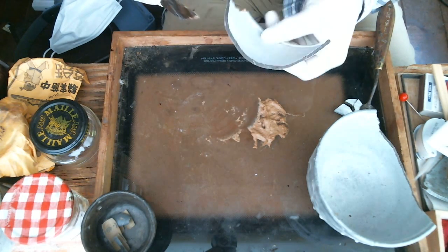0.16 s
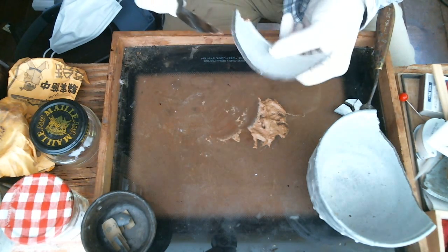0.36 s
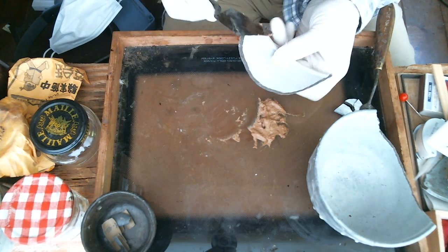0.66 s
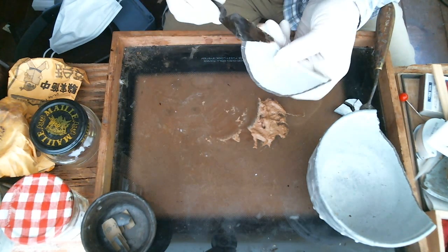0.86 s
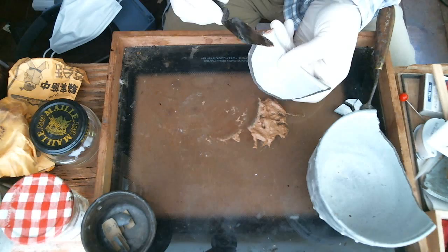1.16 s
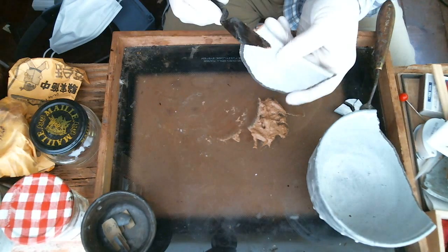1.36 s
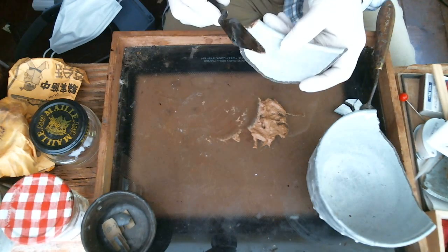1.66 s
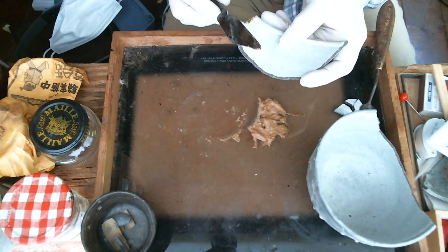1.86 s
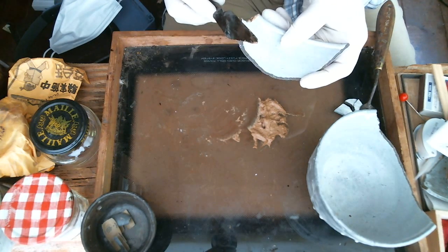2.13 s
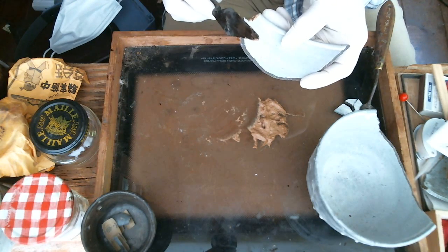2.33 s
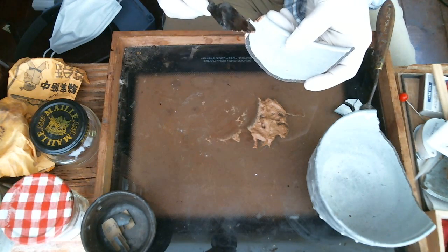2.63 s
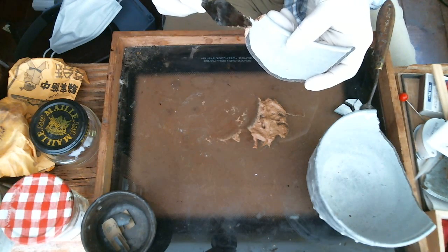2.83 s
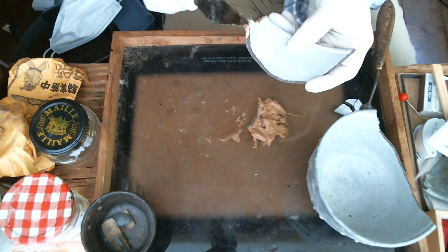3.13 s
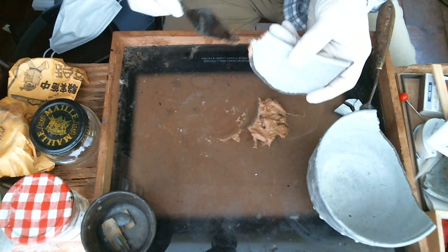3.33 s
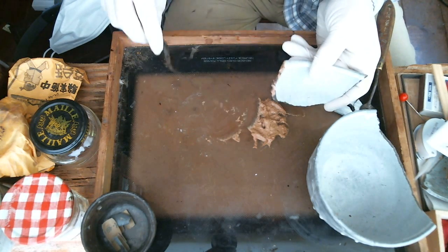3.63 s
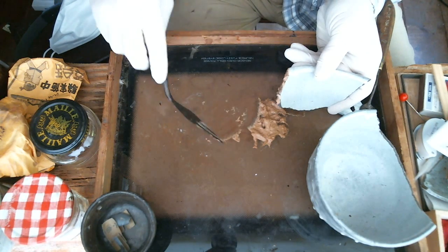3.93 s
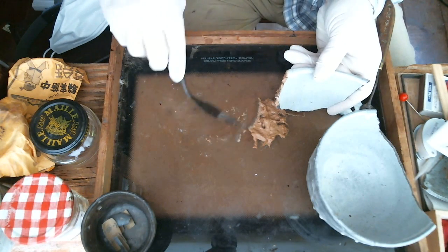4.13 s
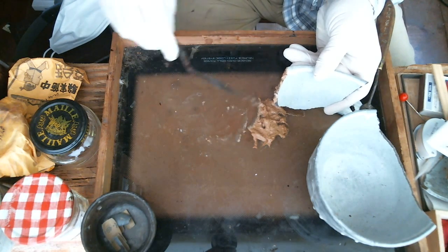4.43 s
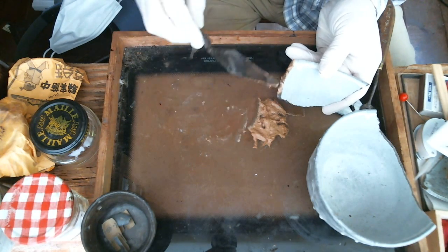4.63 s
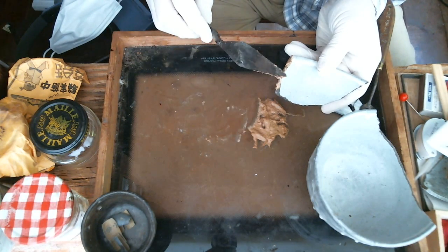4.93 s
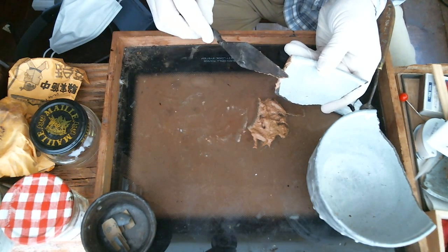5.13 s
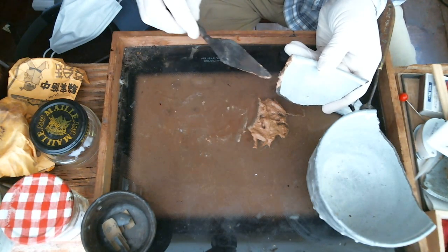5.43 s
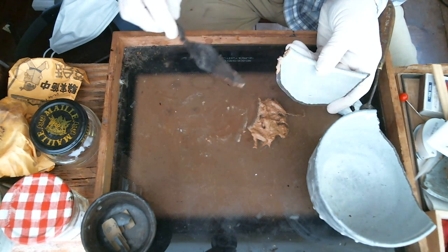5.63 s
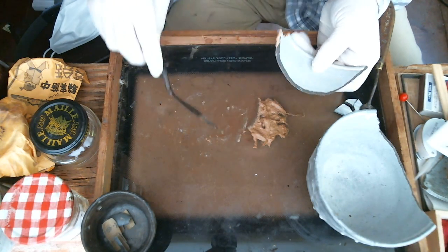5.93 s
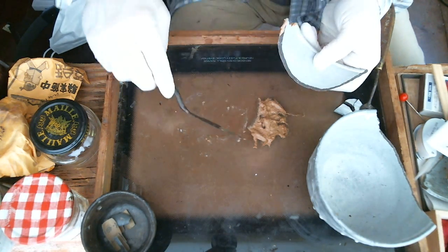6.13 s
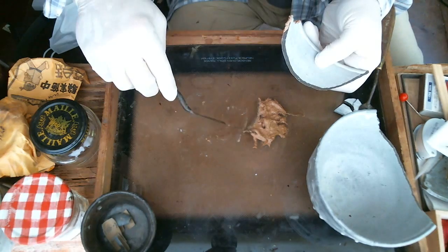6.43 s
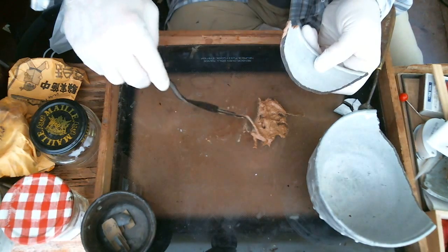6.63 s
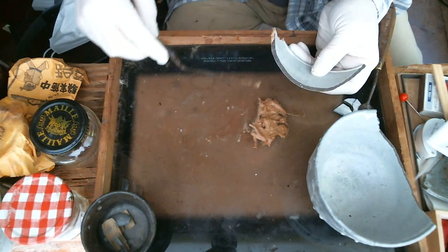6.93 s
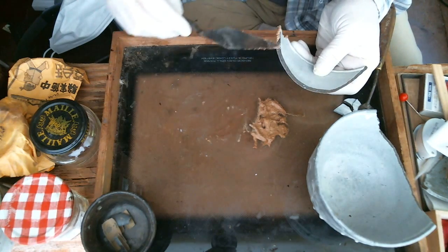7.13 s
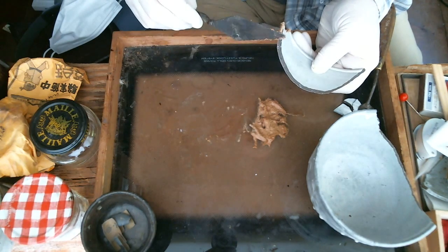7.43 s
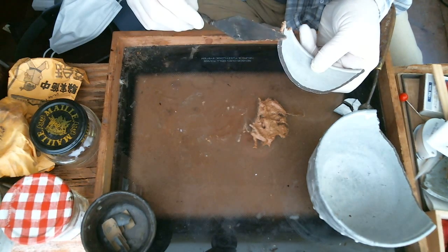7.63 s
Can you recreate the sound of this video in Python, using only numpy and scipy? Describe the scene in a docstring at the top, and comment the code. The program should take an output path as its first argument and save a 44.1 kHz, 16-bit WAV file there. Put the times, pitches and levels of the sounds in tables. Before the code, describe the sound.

Close up indoors, a metal blade ticks and scratches against broken pottery, with a faint brush of gloves. It moves to a glass slab for a rough, catching scrape, returns to the pottery with a burst of crisp clicks, then scrapes the glass again among soft tray knocks. A quiet electronic hiss with soft, rapid low pulsing runs underneath.

```python
"""A steel palette knife works paste on a ceramic shard and scrapes a glass slab, close to a camera.
From the start, the camera's electronics add hiss, faint whines and a soft thump per frame.
To 3.7 s the knife spreads and taps on the broken edge: grit hisses, blade and shard ring, gloves brush.
Near 4 s the blade scrapes and bites the slab; glass rings, the tray under it rumbles. Shard work resumes,
loudest near 5.3 s. Soft tray knocks, sparse before, cluster after 6 s around a second scrape at 6.5 s."""
import sys
import numpy as np
from scipy import signal
from scipy.fft import rfft, irfft, next_fast_len
from scipy.io import wavfile
from scipy.ndimage import map_coordinates

SR = 44100
rng = np.random.default_rng(int(sys.argv[2]) if len(sys.argv) > 2 else 0)


def master(y):
    """Save y as 16-bit WAV."""
    cut = np.clip(np.atleast_2d(y).T, -1, 1)
    pcm = np.round(cut * 32767)  # scale
    wavfile.write(sys.argv[1], SR, pcm.astype(np.int16))


N = 343539

# Shard strokes and glove rubs: (start [s], press [s], hold [s], lift [s], force [dB], centre [Hz],
# half-width [oct], blade drive [dB], shard drive [dB])
SHARD_STROKES = [ (0, 0.021, 0.018, 0.04, -57, 5300, 0.3, -3, 5),
                 (.035, 0.016, 0.07, 0.096, -53, 5960, 0.38, 2, -8),
                 (0.198, .06, 0.076, .06, -81, 6700, 0.45, -8, -19),
                 (0.418, 0.045, .002, 0.044, -48.5, 6640, 0.27, -15, -5),
                 (0.454, 0.024, 0.036, 0.053, -60.5, 980, 0.24, -8, -4.5),
                 (0.5, 0.031, .03, 0.058, -63.5, 7200, 0.28, 11.5, -17),
                 (0.577, .01, 0.035, 0.067, -70, 4760, 0.041, 13, -18),
                 (0.87, 0.023, 0.037, 0.033, -57, 7300, 0.33, 6, -9),
                 (1.252, 0.03, 0.029, .01, -55, 7900, 0.54, 8.5, -10),
                 (1.314, 0.018, 0.021, 0.049, -54, 3500, 0.87, 6, 6),
                 (1.459, 0.028, .002, 0.019, -51, 6250, 0.77, -5, 15),
                 (1.514, 0.0093, 0.11, 0.074, -86, 4900, .99, -5, 12),
                 (1.736, 0.012, .005, 0.11, -53, 3100, 1, 7, 9.5),
                 (1.8, 0.013, .01, .02, -80, 2600, 0.33, -8, -4),
                 (1.915, 0.018, 0.0022, 0.028, -47, 5170, .9, 13, 14.5),
                 (1.952, 0.014, .002, 0.047, -44.5, 5330, .9, 8.5, 8.5),
                 (2, 0.022, .002, 0.029, -50, 5430, 1, 8, 9.5),
                 (2.027, 0.0156, .002, 0.068, -50, 5500, .9, 10, 0.5),
                 (2.091, 0.084, .002, 0.026, -63, 5770, 0.33, 17.5, 1),
                 (2.326, 0.013, .14, 0.03, -56, 4300, 1, 13, 5),
                 (2.33, .03, 0.081, .02, -62, 1150, 0.51, -10, 9),
                 (2.384, .015, 0.011, 0.017, -54, 4950, .8, 12.5, -9),
                 (2.548, 0.019, .03, .02, -52.5, 5040, 0.67, 10.5, -6),
                 (2.51, 0.049, 0.044, .04, -71.5, 1230, 0.085, -10, 14),
                 (2.446, .015, 0.017, 0.017, -48, 860, 0.074, -10, -12),
                 (2.462, 0.036, 0.11, 0.024, -55, 4530, 0.9, 12.5, -4),
                 (2.63, .015, 0.049, 0.012, -61.5, 6000, 0.86, 13.5, -22),
                 (2.7, 0.025, .002, 0.12, -68.5, 5000, 0.08, 18, -17),
                 (2.784, 0.04, .1, 0.027, -71, 5110, .082, 16, -15),
                 (2.938, 0.014, 0.21, 0.018, -84.5, 5400, 0.54, 13, -3),
                 (3.23, 0.017, .002, 0.076, -43, 6050, 0.52, 8, 4),
                 (3.688, 0.049, .002, 0.035, -48, 3970, 0.089, -26, -3),
                 (4.389, 0.029, 0.011, 0.041, -62.5, 4960, 0.14, 7.5, -2),
                 (5.241, 0.087, .002, .01, -48, 6840, .99, 18, 9),
                 (5.326, 0.023, 0.0017, 0.021, -36.5, 7000, .99, 19, 6),
                 (5.37, .015, 0.0021, 0.034, -44.5, 5540, 0.92, -4.5, -10),
                 (5.729, 0.044, .002, 0.042, -44.5, 9190, 1, 12, -15),
                 (6.826, 0.036, 0.017, .03, -72, 4200, 0.18, -9, -3),
                 (6.859, 0.027, 0.014, .03, -70.5, 6300, .15, -9.5, -5)]
# Edge taps: (time [s], force [dB], t60 [s], centre [Hz], half-width [oct], blade drive [dB],
# shard drive [dB])
SHARD_TAPS = [ (0.057, -56, 0.015, 6800, 0.25, -5, -7), (.4664, -62, .016, 7000, .6, -10, -4),
              (0.886, -57, 0.073, 4770, 0.063, 14, -10), (1.3149, -37.5, 0.0094, 5400, 0.51, 0, 2),
              (1.322, -45.5, 0.026, 2980, .99, 16, 11.5), (1.3417, -37, 0.019, 3430, 0.75, 12, 7),
              (1.351, -51, 0.043, 1190, 0.28, 6, 11.5), (1.477, -49.5, .014, 6140, 0.19, -8, 19),
              (1.484, -48, 0.042, 3980, 0.21, 5, -3), (1.487, -48, 0.091, 2050, 0.1, -10, 0),
              (1.514, -52, 0.052, 3550, .59, -8, 5.5), (1.572, -56.5, 0.065, 7200, 0.6, -1, 11),
              (1.719, -40, 0.015, 2820, 0.38, -8, 16), (1.7277, -35.5, 0.023, 4040, 0.52, 8, 16.5),
              (1.8585, -34, 0.014, 7200, 0.2, 4, 11), (2.3426, -52, 0.014, 3000, 0.2, 18, 8),
              (2.375, -52, 0.042, 4970, 1, 10, 12), (2.6201, -38, 0.019, 7800, 1, 12.5, 9.5),
              (2.733, -62.5, 0.019, 9000, .49, -8, -6), (3.2144, -56.5, 0.033, 5120, 0.14, 18, -10),
              (3.248, -26.5, .021, 6950, 0.94, 13.5, -6), (3.4106, -47, 0.024, 4830, 0.86, 3, -9.5),
              (3.5102, -43.5, 0.011, 11200, 0.28, -10, -3), (3.534, -47.5, .017, 3200, 0.12, 2, -16),
              (5.269, -47, 0.039, 7900, 0.99, 14.5, 2), (5.277, -47, .015, 4000, .8, 11, -8),
              (5.3063, -37, 0.026, 6560, .98, 9, 6), (5.3443, -34.5, 0.016, 6500, .99, 2, -7),
              (5.3557, -35, 0.011, 5997, .99, 17, -3.5), (5.3823, -38, .028, 4987, .99, 8.5, -10.5),
              (5.7467, -53, 0.019, 9000, 0.33, 3, -8), (5.7589, -40.5, .023, 10000, .45, 2.5, 0),
              (6.348, -62.5, .028, 3400, .2, -2.5, -2), (6.364, -67.5, .02, 9000, .3, -1, -7)]
# Bare contact radiation: (frequency [Hz], gain [dB])
CONTACT_EQ = [(300, -28.5), (1500, -16), (2800, -3), (4200, -3.5), (7000, -2.5), (10500, 4), (13000, -5),
              (15700, -19.5)]
# Blade, shard and slab resonances: (frequency [Hz], bandwidth [Hz], gain [dB])
BLADE_MODES = [(3030, 180, -5.5), (5030, 240, -0.5), (5364, 212, -6.5), (7760, 228, 0), (8820, 170, -6.5),
               (10500, 69, -3), (13000, 33, -15)]
SHARD_MODES = [(850, 100, -16.5), (1268, 140, -5), (2115, 150, -9), (2643, 190, -1), (3615, 92, -6),
               (5950, 129, 4.5), (9990, 81, 4.5)]
SLAB_MODES = [(456.4, 14.4, -2.5), (713, 38, -1), (1292, 167, -10.5), (1965, 94, -11.5), (2530, 90, -2),
              (3020, 80, -4), (3450, 98, -5.5), (4590, 140, 1.5), (6200, 140, -2), (7900, 160, 0.5),
              (9370, 250, -9.5), (11810, 170, -5)]
# Room decay: (frequency [Hz], t60 [s])
ROOM_T60 = [(1000, 0.15), (5000, 0.065), (12000, 0.056)]
# Preamplifier hiss spectrum: (frequency [Hz], relative level [dB])
HISS_EQ = [(18, -59.5), (45, -23), (110, -8.5), (250, -8), (600, -16), (1230, -23.5), (2900, -28.5),
           (6500, -32.5), (8200, -31), (10000, -33.5), (15700, -38)]
# Electronic tones: (frequency [Hz], relative level [dB])
WHINE_TONES = [(2762, -98), (7564, -101), (7650, -106), (7924, -106), (8037, -99.5), (8403, -100),
               (8506, -101), (9092, -106)]
# Supply dip trend: (time [s], lag after frame edge [ms], pulse level [dB], ringing share [0-1])
DIP_TREND = [(0, 23.16, -40.5, 0.52), (1, 23.78, -39.5, 1), (3.5, 22.83, -40.5, 0.6),
             (4.8, 22.38, -42.5, 0.28), (7.79, 21.6, -43, 0.17)]
# Ringing and plain thump spectra: (frequency [Hz], relative level [dB])
RINGING_THUMP_EQ = [(60, -28.5), (120, -15), (240, 4.5), (330, -2), (500, -15), (900, -22.5), (1600, -38),
                    (2500, -120)]
PLAIN_THUMP_EQ = [(40, -29.5), (120, 0.5), (250, -3.5), (500, -6.5), (900, -20.5), (1600, -36),
                  (2500, -120)]
# Soft tray knocks: (time [s], level [dB], frequency [Hz], length [cycles])
TRAY_KNOCKS = [(0.449, -55, 630, 2.7), (1.37, -57, 476, 15.6), (3.848, -55.5, 228, 4.9),
               (4.19, -54, 113, 2.6), (4.22, -50, 123, 2.2), (6.115, -51, 732, 4.2),
               (6.129, -55.5, 256, 2.9), (6.218, -50, 160.5, 4.5), (6.417, -66, 265, 5.7),
               (6.6, -53, 798, 6), (7.045, -60.5, 159, 4.4), (7.243, -58, 137, 4.4)]
# Slab strokes: (start [s], press [s], hold [s], lift [s], force [dB], centre [Hz], half-width [oct],
# slab drive [dB], tray drive [dB])
SLAB_SCRAPES = [ (3.98, 0.026, 0.045, .01, -70.5, 4130, 0.24, 2, -23.5),
                (4.047, 0.036, 0.055, 0.083, -53, 2497, 2.1, 15, -3),
                (4.158, .012, .09, 0.056, -51, 2590, 2.3, 7.5, 2),
                (4.277, 0.035, .002, 0.022, -56, 3080, 0.63, -7, -11),
                (4.281, 0.02, 0.0067, 0.017, -64, 760, 0.12, 12.5, -11),
                (6.492, 0.042, 0.1, 0.032, -69.5, 2600, 0.16, 10.5, -20),
                (6.478, 0.056, 0.097, .02, -67, 6390, 0.38, 10, -20),
                (6.582, .015, .03, 0.079, -64.5, 737, 0.26, 10, 6.5)]
# Blade biting the slab: (time [s], force [dB], t60 [s], centre [Hz], half-width [oct], slab drive [dB],
# tray drive [dB])
SLAB_CATCHES = [ (4.099, -48.5, .043, 2600, 0.74, 4, -16), (4.13, -44, 0.047, 484, 0.7, 10, 0),
                (4.139, -44.5, 0.11, 1360, 0.26, 11, -9), (4.177, -49, 0.072, 1100, 0.77, 8, -23),
                (4.219, -46.5, 0.029, 1320, 0.31, 15.5, -6), (4.254, -64, 0.044, 480, .35, -5, -8),
                (4.308, -63, 0.033, 3200, .8, 2, -8), (6.484, -56, 0.073, 2200, 0.31, 4.5, -20)]
# Tray rumble: (frequency [Hz], gain [dB])
TRAY_EQ = [(25, -30), (60, -12), (130, 2), (220, -7.5), (600, -6), (1000, -38), (1600, -47), (3000, -120)]

BANDS_HZ = 130 * 2 ** (np.arange(18) * .4)
TAP_RISE_S, CATCH_RISE_S = .00042, .00062
TOUCH_PRESSURE, PRESSURE_EXPONENT = .37, 5  # pressure at stroke ends, full = 1
SKIRT_EXPONENT, BODY_EXPONENT = 2.01, .73
HISS_DB, THUMP_SCATTER_DB = -72.5, 4
FRAME_HZ, TOP_HZ = 30, 15780


def amp(db):
    return 10 ** (np.asarray(db) / 20)


def log_interp(points, hz):
    """Interpolate (frequency [Hz], value) on a log axis."""
    knots_hz, values = np.transpose(points)
    return np.interp(np.log(hz + 1), np.log(knots_hz + 1), values)


def wobble(rate_hz):
    """Random curve, linear between Gaussian knots."""
    knots = rng.standard_normal(int(N * rate_hz / SR) + 4)
    return map_coordinates(knots, [np.arange(N) * rate_hz / SR], order=1)


def filtered(x, response, keep_power=False):
    """FFT filter; keep_power gives unit gain for white noise."""
    size = next_fast_len(N + SR // 2)
    gain = response(np.fft.rfftfreq(size, 1 / SR))
    if keep_power:
        gain = gain / np.sqrt(np.mean(np.abs(gain) ** 2))
    return irfft(rfft(x, size) * gain, size)[:N]


def eq(points):
    """Zero-phase response through (frequency [Hz], gain [dB])."""
    return lambda hz: amp(log_interp(points, hz))


def body(modes):
    """Causal response: resonances of alternating sign, summed."""
    return lambda hz: sum(
        (-1) ** k * amp(db) * 1j * hz * width_hz / (mode_hz ** 2 - hz ** 2 + 1j * hz * width_hz)
        for k, (mode_hz, width_hz, db) in enumerate(modes))


def grit(rough_db, patchy_db):
    """Unit-rms noise bands; passing grains shake all together, the shifting contact each apart."""
    size = next_fast_len(N)
    grains = rng.standard_normal(N) * amp(rough_db * (wobble(80) + wobble(600)))
    offset_oct = np.log2(np.fft.rfftfreq(size, 1 / SR) + 1) - np.log2(BANDS_HZ)[:, None]
    bands = irfft(rfft(grains, size) * np.exp(-(offset_oct / .33) ** 2), size)[:, :N]
    knots = rng.standard_normal((len(bands), N // 1000 + 2))
    patches = np.array([np.interp(np.arange(N) / 1000, np.arange(len(row)), row) for row in knots])
    bands *= amp(patchy_db * patches)
    return bands / bands.std(axis=1, keepdims=True)


def add_contact(forces, bands, start_s, envelope, centre_hz, half_width_oct, first_db, second_db):
    """One contact: band-shaped grit drives the air and, with a broader spectrum, two bodies."""
    start = round(start_s * SR)
    span = slice(start, start + len(envelope))
    distance = np.abs(np.log2(BANDS_HZ / centre_hz)) / max(half_width_oct, .05)
    narrow = 1 / (1 + distance ** SKIRT_EXPONENT)
    air, struck = [envelope * (weights @ bands[:, span]) / np.linalg.norm(weights)
                   for weights in (narrow, narrow ** BODY_EXPONENT)]
    forces[:, span] += [air, amp(first_db) * struck, amp(second_db) * struck]


def contact_forces(bands, strokes, taps, rise_s):
    """Strokes grow steeply with pressure; taps rise and decay. Rows: air, first body, second body."""
    forces = np.zeros((3, N))
    for start_s, press_s, hold_s, lift_s, db, *touch in strokes:
        corners_s = np.cumsum([0, press_s, hold_s, lift_s])
        t = np.arange(round(corners_s[-1] * SR)) / SR
        pressure = np.interp(t, corners_s, [TOUCH_PRESSURE, 1, 1, TOUCH_PRESSURE])
        add_contact(forces, bands, start_s, amp(db) * pressure ** PRESSURE_EXPONENT, *touch)
    t = np.arange(SR // 8) / SR
    for start_s, db, t60_s, *touch in taps:
        envelope = amp(db - 60 * t / t60_s) * (1 - np.exp(-t / rise_s))
        add_contact(forces, bands, start_s, envelope, *touch)
    return forces


def knife_on_shard(bands):
    """Grit under strokes and taps hisses and rings blade and shard."""
    air, blade, shard = contact_forces(bands, SHARD_STROKES, SHARD_TAPS, TAP_RISE_S)
    ring = filtered(blade, body(BLADE_MODES)) + filtered(shard, body(SHARD_MODES))
    return filtered(air, eq(CONTACT_EQ)) + ring


def room(x):
    """Short diffuse tail; treble dies first."""
    hz, t, spectrum = signal.stft(rng.standard_normal(SR // 4), SR, nperseg=256)
    decay = amp(-60 * t / log_interp(ROOM_T60, hz)[:, None])
    tail = signal.istft(spectrum * decay, SR, nperseg=256)[1]
    delayed = np.pad(x, (150, 0))
    return signal.fftconvolve(delayed, tail / np.linalg.norm(tail))[:N]


def preamp_hiss():
    """Near-steady preamplifier noise, strongest in the bass."""
    noise = amp(HISS_DB + .2 * wobble(8)) * rng.standard_normal(N)
    return filtered(noise, eq(HISS_EQ), keep_power=True)


def whines():
    """Thin electronic tones, wavering in level and phase."""
    t = np.arange(N) / SR
    return sum(amp(db + 6 + 2.1 * wobble(15)) * np.sin(2 * np.pi * hz * t + 3 * wobble(25))
               for hz, db in WHINE_TONES)


def blips(rows):
    """Soft-onset tone bursts from (time [s], level [dB], frequency [Hz], length [cycles])."""
    out = np.zeros(N + SR)
    for start_s, db, hz, cycles in rows:
        turns = np.arange(int(cycles / hz * SR)) * hz / SR
        envelope = amp(db) * np.sin(np.pi * np.sqrt(turns / cycles)) ** 2
        out[int(start_s * SR):][:len(turns)] += envelope * np.sin(2 * np.pi * turns)
    return out[:N]


def stray_blips(ringing_share, count=260, cycles=2.6):
    """Random low blips; pitch follows the thumps' colour."""
    times_s = rng.random(count) * N / SR
    size, pitch = rng.standard_normal((2, count))
    centre_hz = 170 + 90 * ringing_share[(times_s * SR).astype(int)]
    hz = centre_hz * np.exp(.35 * np.clip(pitch, -1.5, 3))
    return blips(zip(times_s, -69 + 4 * size, hz, np.full(count, cycles)))


def frame_thumps():
    """One supply dip of uneven depth per frame, with stray blips between."""
    times_s, *columns = np.transpose(DIP_TREND)
    lag_ms, dip_db, ringing_share = [np.interp(np.arange(N) / SR, times_s, col) for col in columns]
    edges = np.arange(int(N / SR * FRAME_HZ)) * SR // FRAME_HZ
    onsets = np.minimum(edges + (lag_ms[edges] * SR / 1000).astype(int), N - 1)
    scatter_db = THUMP_SCATTER_DB * np.clip(rng.standard_normal(len(onsets)), -2, 1.8)
    dips = np.zeros(N)
    dips[onsets] = -amp(dip_db[onsets] + scatter_db)
    ringing = filtered(dips * ringing_share, eq(RINGING_THUMP_EQ), keep_power=True)
    plain = filtered(dips * (1 - ringing_share), eq(PLAIN_THUMP_EQ), keep_power=True)
    return ringing + plain + stray_blips(ringing_share)


def tray_knocks():
    """Each soft knock swings the tray for a few cycles."""
    return blips(TRAY_KNOCKS)


def knife_on_slab(bands):
    """The blade judders over glass; the slab rings, the tray rumbles."""
    air, slab, tray = contact_forces(bands, SLAB_SCRAPES, SLAB_CATCHES, CATCH_RISE_S)
    return filtered(air, eq(CONTACT_EQ)) + filtered(slab, body(SLAB_MODES)) + filtered(tray, eq(TRAY_EQ))


def scene():
    """Knife work in a room, over the camera's electronics."""
    bands = grit(rough_db=2, patchy_db=4)
    work = knife_on_shard(bands) + tray_knocks() + knife_on_slab(bands)
    reverb = amp(-12) * room(work)
    electronics = preamp_hiss() + whines() + frame_thumps()
    return (work + reverb + electronics)[None]


def record(dry):
    """Camera band limit: brick-wall low-pass."""
    return filtered(dry[0], lambda hz: hz < TOP_HZ)[None]


dry = scene()
out = record(dry)
master(out)
```